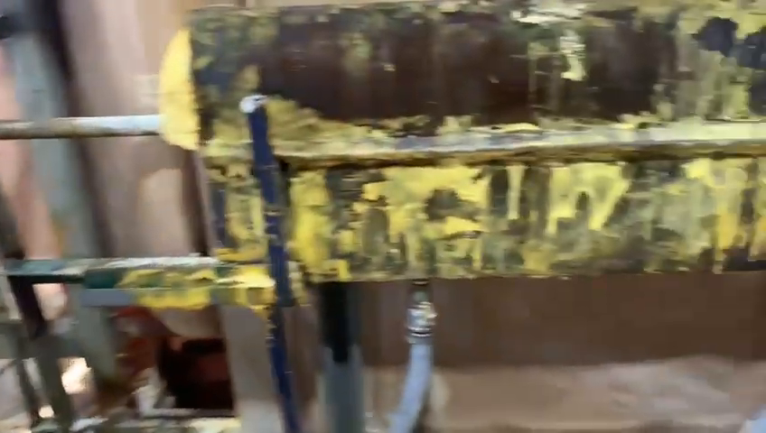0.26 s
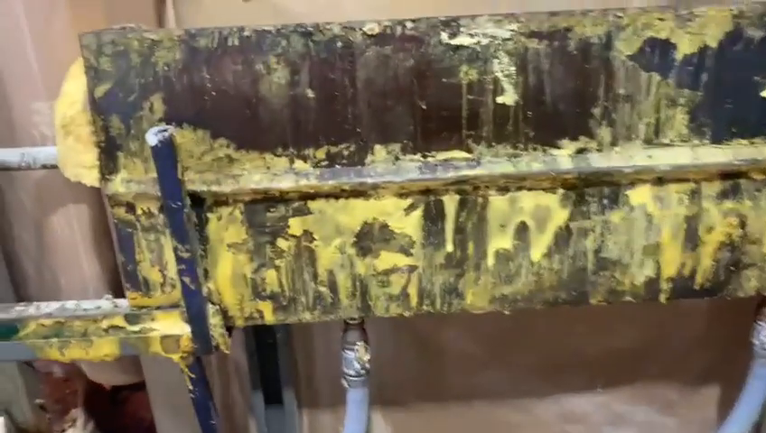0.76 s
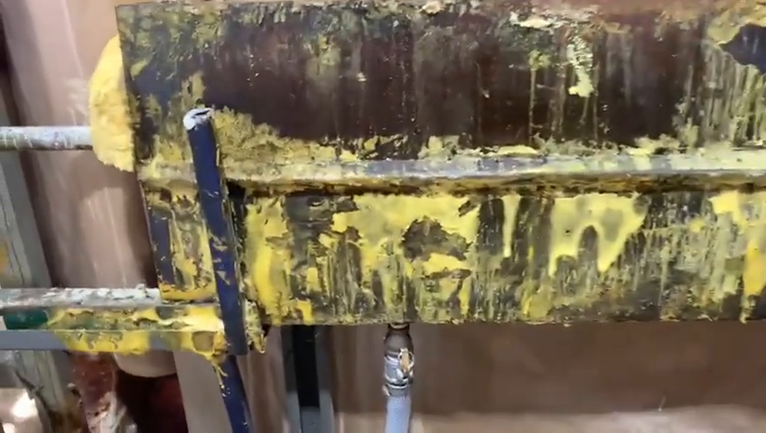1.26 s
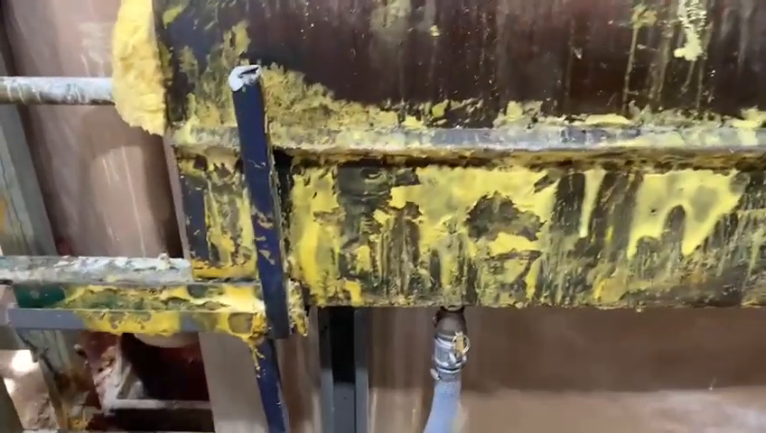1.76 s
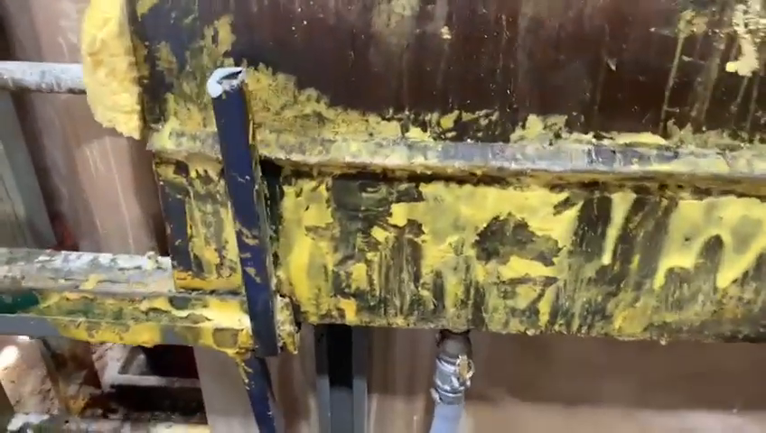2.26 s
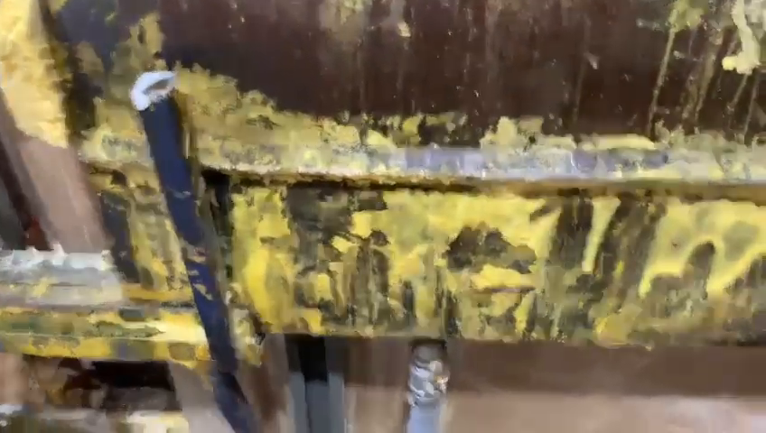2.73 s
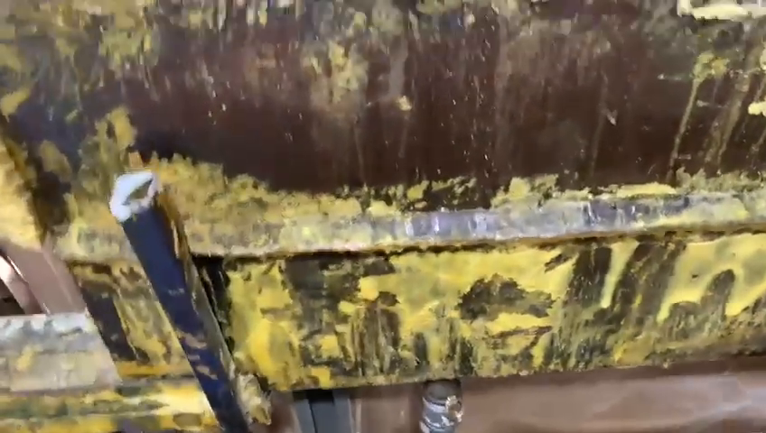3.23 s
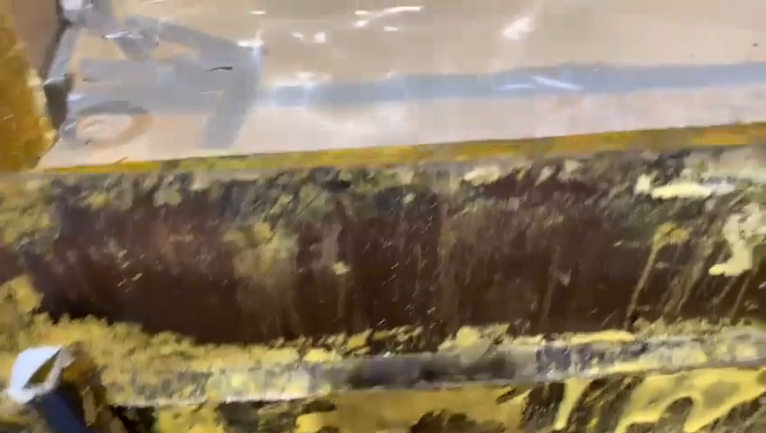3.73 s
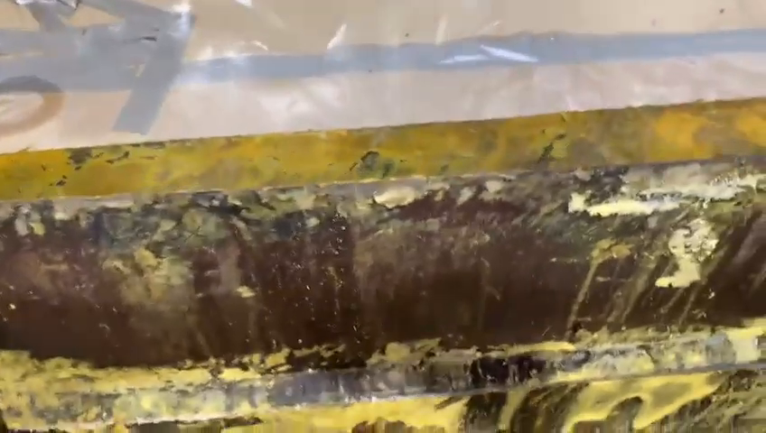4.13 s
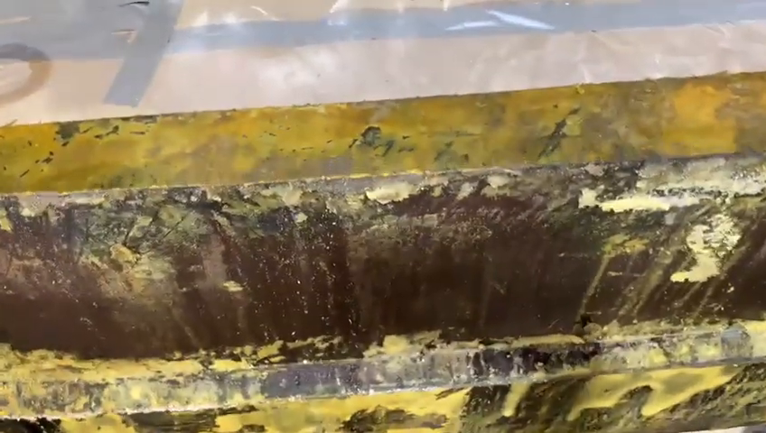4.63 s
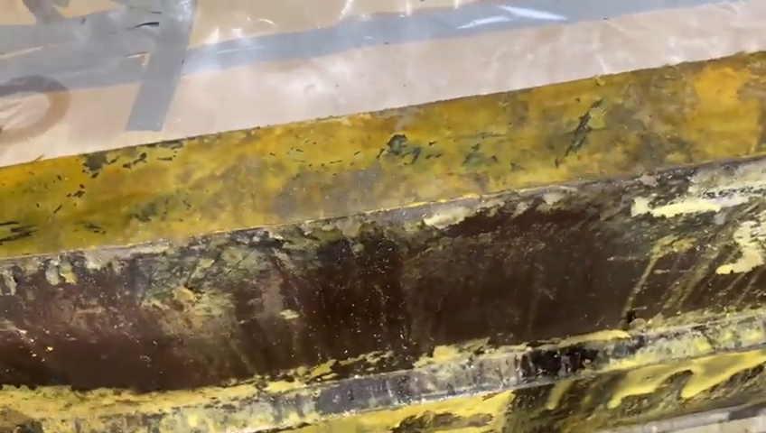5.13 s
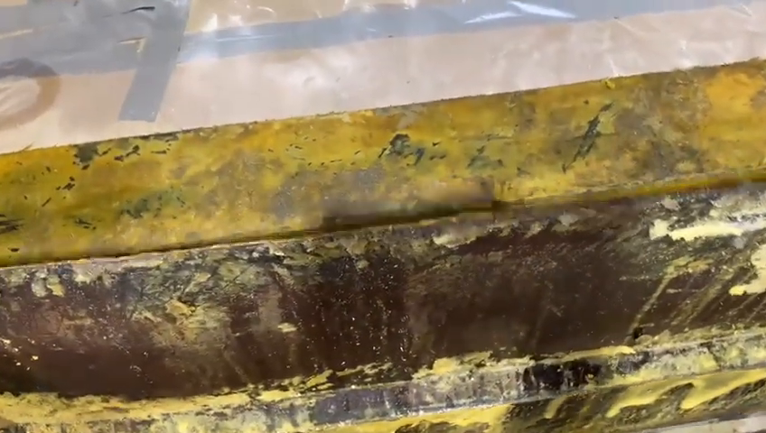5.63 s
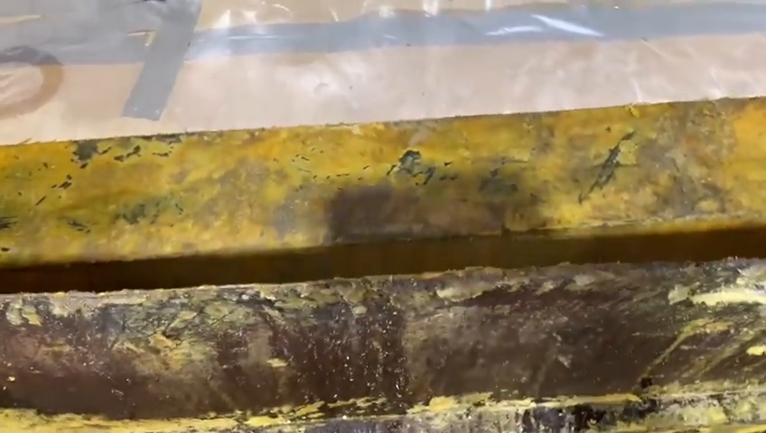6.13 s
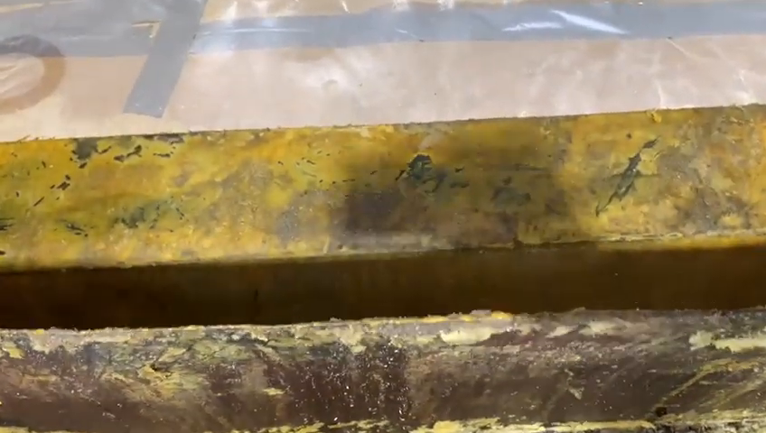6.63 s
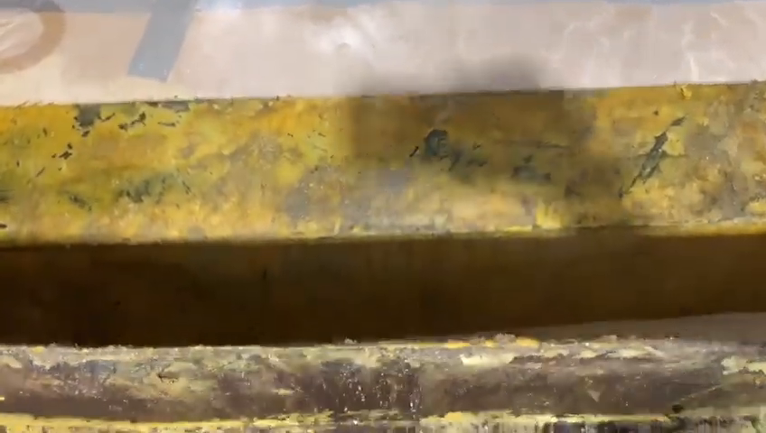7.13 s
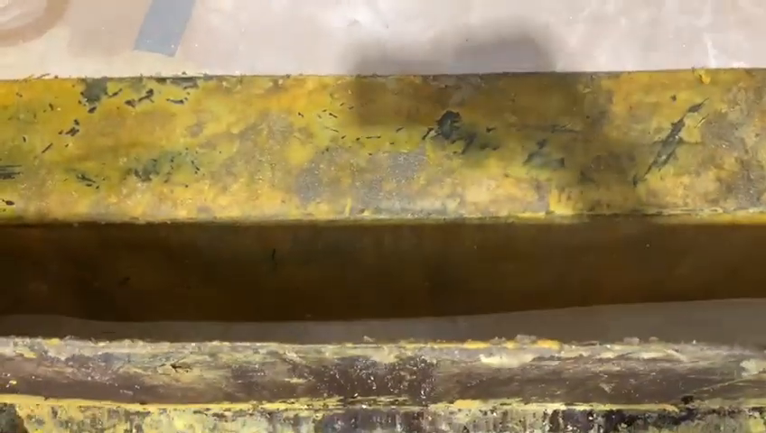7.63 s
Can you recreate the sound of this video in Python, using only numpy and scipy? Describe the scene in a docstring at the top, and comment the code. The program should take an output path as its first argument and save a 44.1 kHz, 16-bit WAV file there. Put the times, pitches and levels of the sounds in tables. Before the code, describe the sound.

A continuous hum of machines and fans fills a large hall, with thin, fluttering whines shifting above it.

```python
"""A factory hall, heard by a hand-held phone that drifts along a steel trough and tips into it.
A knocking machine and two fans hum in harmonic series; a variable-speed motor whines at its slot
harmonics and their sidebands. Under them lies the reverberant roar of the hall. Direct and reflected
waves interfere, so every tone swells and fades as the phone moves through the standing waves.
All sources sound from the start, each as a centre (sum) and a side (difference) signal."""
import sys
import numpy as np
from scipy import signal
from scipy.fft import irfft, next_fast_len
from scipy.io import wavfile
from scipy.ndimage import uniform_filter1d, map_coordinates

SR = 44100
rng = np.random.default_rng(int(sys.argv[2]) if len(sys.argv) > 2 else 0)


def materialize(psi):
    """Save the field psi as 16-bit PCM at rate SR to the path in sys.argv[1].

    A 1-D psi becomes a single channel; in a 2-D psi each row is a channel.
    """
    bounded = np.clip(np.atleast_2d(psi).T, -1, 1)
    quanta = np.round(bounded * 32767).astype(np.int16)
    wavfile.write(sys.argv[1], SR, quanta)


N = 347419
FFT_SIZE, TIME = next_fast_len(N), np.arange(N) / SR
STROKE_HZ, FAN_HZ, BLOWER_HZ = 40.37, 28.8, 26.56  # stroke rate and the two shaft rates
SUPPLY_SHARE = .1387  # supply frequency over slot frequency


def undb(db):
    """Amplitude ratio of a level."""
    return 10 ** (np.asarray(db, float) / 20)


def at_frequency(table, hz):
    """Columns interpolated on a logarithmic frequency axis."""
    first, *rest = np.transpose(table)
    return [np.interp(np.log(np.maximum(hz, 1)), np.log(first), c) for c in rest]


def in_time(table):
    """Columns interpolated at every sample."""
    first, *rest = np.transpose(table)
    return [np.interp(TIME, first, c) for c in rest]


def complex_noise(*shape):
    """Gaussian amplitudes of unit power and random phase."""
    return (rng.standard_normal(shape) + 1j * rng.standard_normal(shape)) / np.sqrt(2)


def walk(rate, step=32):
    """Low-pass noise: random values held 1 / rate s and smoothed twice."""
    hold = int(SR / rate / step)
    coarse = np.repeat(rng.standard_normal(N // step // hold + 2), hold)
    return np.repeat(uniform_filter1d(uniform_filter1d(coarse, hold), hold), step)[:N]


# Coherence of side with centre: f/Hz, in-phase part, quadrature part
COHERENCE = [(50, -.2, .2), (125, -0.66, .22), (250, -0.29, .2), (600, 0.18, .4), (1100, 0.23, .4),
             (1600, -0.26, -.2), (2400, 0.095, .12), (4800, -0.095, -.05), (7000, -0.19, .1)]

def coherent_side(centre, independent, hz):
    """Partial coherence: the side is a phase-shifted share of the centre plus an independent part."""
    in_phase, quadrature = at_frequency(COHERENCE, hz)
    share = in_phase + 1j * quadrature
    return share * centre + np.sqrt(np.clip(1 - abs(share) ** 2, 0, 1)) * independent


def multipath(hz, centre_db, side_db, phone_m_per_s=.25):
    """Multipath fading: each direct ray beats with reflections Doppler-shifted by the phone's motion."""
    spectrum = np.zeros((2, FFT_SIZE // 2 + 1), complex)
    offset = np.arange(-80, 81)
    for f, db in zip(hz, np.transpose([centre_db, side_db])):
        spread = np.exp(-abs(offset) * SR / FFT_SIZE / (.06 + .6 * f * phone_m_per_s / 343))
        direct = np.clip(400 / f, .4, 3)  # long waves keep their direct ray
        rays = complex_noise(2, len(offset)) * spread / np.sqrt(np.sum(spread ** 2))
        rays[:, offset == 0] += direct * np.exp(2j * np.pi * rng.random((2, 1)))
        rays[1] = coherent_side(rays[0], rays[1], f)
        bins = int(round(f * FFT_SIZE / SR)) + offset
        spectrum[:, bins] += undb(db)[:, None] * rays / np.sqrt(1 + direct ** 2)
    return irfft(spectrum, FFT_SIZE) * FFT_SIZE / np.sqrt(2)


def fluttering_tone(cycles, centre_db, side_db, lean=0.):
    """Interference: reflections make a tone flutter, more at high pitch; lean draws it to the right."""
    mean_hz = cycles[-1] * SR / N
    phase = 2 * np.pi * (cycles + rng.random())
    side_phase = np.pi + (1 - lean) * (2 * np.pi * (rng.random() - .5) + 2.87 * walk(1.53))
    faintness = np.clip(undb(-36 - centre_db), .3, 1)  # loud peaks are steadier
    depth = .55 * min((mean_hz / 3000) ** .44, 1.3) * faintness
    shimmer = .9 * (walk(55) + 1j * walk(55))
    flutter = (1 + depth * (walk(9) + 1j * walk(20) + shimmer)) / np.sqrt(1 + depth ** 2)
    centre = flutter * np.exp(1j * phase)
    side = centre * np.exp(1j * side_phase)
    return np.sqrt(2) * np.array([undb(centre_db) * centre.imag, undb(side_db) * side.imag])


# Standing-wave maxima: peak t/s, f/Hz, width at half amplitude/s, centre level/dB, side level/dB
SWELLS = [(0.1, 3362, 0.25, -44, -47), (0.015, 2394, 0.08, -39, -47), (0.102, 5770, 0.32, -46, -53),
          (0.1, 5319, 0.35, -48, -60), (0.1, 345.6, 0.4, -43, -54), (0.62, 2987, 0.62, -41, -52),
          (0.22, 2953, 0.3, -39, -50), (2.1, 2953, 0.54, -42, -51), (3.0, 2953, 0.2, -38, -50),
          (1.75, 3372, 0.2, -46, -52), (1.75, 3859, 0.22, -44, -55), (2.6, 3859, 0.44, -48, -55),
          (5.0, 3859, 0.23, -49, -55), (4.5, 3926, 0.16, -51, -55), (6.0, 1108, 0.39, -45, -54),
          (7.5, 1108, 0.31, -49, -50), (1.75, 939, 0.27, -44, -52), (7.3, 2642, 0.9, -47, -56),
          (3.753, 2987, 0.25, -45, -52), (0.75, 163, 0.3, -48, -49), (1.1, 1100, 0.5, -44.5, -50),
          (1.45, 2630, 0.15, -42, -58), (0.196, 2896, 0.1, -29.5, -56), (0.25, 1476, 0.41, -52, -49),
          (0.3, 2394, 0.35, -40, -50), (0.3, 5386, 0.15, -50.5, -58), (0.301, 3860, 0.15, -47, -53),
          (0.3, 4440, 0.27, -46, -55), (0.35, 1529, 0.73, -43, -46), (0.5, 4860, 0.25, -51, -44),
          (0.65, 3860, 0.15, -47, -52), (0.85, 943, 0.24, -48, -48), (0.18, 3927, 0.13, -48, -40),
          (0.25, 4370, 0.23, -44, -43), (0.3, 481, 1.0, -67, -46), (0.336, 2877, 0.23, -26.5, -36),
          (0.37, 162.2, 0.18, -32, -39), (0.41, 4320, 0.1, -48, -40), (0.442, 2890, 0.072, -33, -42),
          (0.48, 2465, 0.25, -36.5, -66), (0.5, 173, 2.5, -35, -50), (0.582, 3361, 0.2, -28.5, -56),
          (0.57, 4370, 0.1, -41, -59), (0.6, 411.7, 1.24, -42, -50), (0.61, 3440, 0.25, -62, -38),
          (0.68, 4420, 0.23, -44, -53), (0.69, 421, 0.87, -42.5, -47), (0.686, 3380, 0.092, -45, -44),
          (0.84, 3890, 0.086, -43, -37), (0.867, 161, 0.19, -33.5, -47), (0.915, 2460, 0.16, -38, -66),
          (0.92, 3927, 0.13, -47, -40), (1.0, 1522, 0.52, -38, -43), (1.048, 2404, 0.36, -44, -44),
          (1.05, 1220, 0.44, -40.5, -39), (1.35, 2460, 0.15, -49, -60), (1.55, 3420, 0.16, -43, -48),
          (1.38, 161.7, 0.16, -37, -48), (1.472, 2870, 0.15, -37, -47), (1.54, 345.7, 0.68, -36.5, -70),
          (1.647, 2461, 0.1, -32.5, -66), (1.75, 1222, 0.32, -44, -46), (1.85, 412, 0.59, -41, -50),
          (1.848, 1470, 0.23, -50, -46), (1.897, 162, 0.7, -44, -54), (1.901, 3010, 0.42, -51, -52),
          (2.2, 2645, 0.12, -45.5, -58), (2.4, 345.6, 1.1, -44, -54), (2.692, 1525, 0.29, -48.5, -45),
          (3.0, 172.4, 0.9, -40, -56), (1.923, 2900, 0.097, -39, -35), (2.3, 1212, 0.91, -47, -53),
          (1.96, 3353, 0.072, -34, -54), (2.102, 2392, 0.4, -34, -66), (1.95, 174.4, 1.3, -41, -56),
          (2.294, 1523, 0.3, -34.5, -49), (2.34, 1490, 0.21, -51, -37), (2.4, 935, 0.53, -47, -46),
          (2.37, 161, 0.16, -35.5, -56), (2.5, 426.5, 0.98, -42.5, -52), (2.6, 2395, 0.15, -51, -29),
          (2.66, 1533, 0.36, -54, -34), (3.1, 3372, 0.34, -47, -52), (2.8, 3410, 0.43, -40, -51),
          (3.0, 939, 0.43, -52, -50), (3.05, 4960, 0.22, -48, -52), (2.83, 3850, 0.1, -39, -45),
          (2.9, 2390, 0.27, -43, -66), (2.98, 4350, 0.39, -46, -66), (3.0, 480, 0.8, -58, -66),
          (3.18, 345.4, 0.81, -40, -48), (3.21, 3840, 0.25, -48, -65), (3.277, 151, 0.19, -35.5, -53),
          (3.348, 1530, 0.27, -38, -44), (3.3, 1214, 0.26, -42, -50), (3.7, 1493, 0.5, -41.5, -39),
          (4.0, 2399, 0.22, -45.5, -60), (3.55, 160.7, 0.25, -40, -51), (3.596, 2940, 0.4, -61, -56),
          (4.1, 172.4, 0.69, -42.5, -50), (4.1, 348, 0.64, -50, -51), (4.75, 172.8, 0.3, -39, -51),
          (4.853, 2670, 0.24, -40, -55), (5.15, 1528, 0.85, -45.5, -39), (6.103, 171.2, 0.3, -43, -54),
          (6.452, 1133, 0.53, -44, -47), (6.7, 2980, 0.52, -43.5, -58), (6.998, 162.5, 0.25, -38, -52),
          (7.15, 1104, 0.22, -48, -50), (7.15, 2985, 0.12, -38, -52), (7.15, 2670, 0.2, -48, -57),
          (7.25, 174, 0.25, -43, -54), (4.097, 4413, 0.24, -48, -57.5), (4.251, 1200, 0.12, -43, -46),
          (4.256, 2870, 0.57, -47, -48), (4.546, 5420, 0.37, -47.5, -54), (4.545, 4310, 0.23, -47, -55),
          (4.65, 2440, 0.24, -46, -53), (4.75, 1176, 0.39, -45, -47), (4.75, 3410, 0.71, -46, -48),
          (5.0, 4832, 0.24, -44.5, -55), (5.199, 5310, 0.4, -51, -60), (5.201, 4940, 0.4, -59, -47),
          (5.3, 3376, 0.21, -45, -50), (5.45, 4840, 0.25, -52, -58), (5.55, 2510, 0.22, -53, -55),
          (5.6, 4460, 0.14, -49, -55), (4.5, 1535, 0.79, -36.5, -37), (4.513, 3396, 0.14, -34.5, -42),
          (4.69, 4410, 0.24, -45, -48), (4.8, 161, 0.35, -44, -59), (4.92, 2886, 0.092, -45, -37),
          (5.0, 485, 5.3, -44, -50), (5.01, 3372, 0.1, -56, -35), (5.017, 2405, 0.29, -38, -44),
          (5.052, 1013, 0.56, -44, -43), (5.13, 2450, 0.1, -42, -51), (5.2, 1213, 0.34, -44, -38),
          (5.58, 3460, 0.63, -53, -41), (5.605, 151.5, 0.16, -38, -58), (5.893, 943, 0.64, -45, -46),
          (5.75, 1182, 0.57, -38.5, -40), (5.85, 1218, 0.25, -45, -50), (6.35, 1183, 0.68, -43, -46),
          (6.6, 4444, 0.71, -45.5, -55), (6.65, 4900, 0.2, -51, -60), (6.903, 3470, 0.27, -42, -54),
          (6.9, 4900, 0.7, -52, -56), (6.947, 3950, 0.25, -47, -50), (7.053, 2400, 0.25, -42, -55),
          (7.103, 3420, 0.16, -39, -47), (7.2, 950, 0.45, -52, -55), (7.25, 4460, 0.4, -52, -55),
          (7.4, 4840, 0.4, -51, -49), (7.45, 3460, 0.21, -51, -48), (7.555, 3439, 0.22, -39, -50),
          (6.04, 2466, 0.25, -35.5, -51), (6.1, 2890, 0.3, -32, -43), (6.36, 2890, 0.25, -36, -43),
          (6.2, 3380, 0.22, -35, -36), (6.4, 2390, 0.4, -53, -34), (6.37, 3853, 0.31, -45.5, -53),
          (6.5, 1009, 0.25, -46, -47), (6.6, 1524, 1.24, -40.5, -67), (6.63, 2884, 0.38, -36, -35),
          (6.7, 2480, 0.7, -43, -43), (6.94, 4350, 0.18, -50, -42), (7.08, 3950, 0.55, -60, -46),
          (7.167, 2870, 0.11, -47, -41), (7.35, 3365, 0.21, -36.5, -50), (7.43, 2404, 0.14, -36.5, -66),
          (7.3, 1216, 0.59, -48.5, -40), (7.57, 2474, 0.18, -37, -66), (7.67, 940, 0.26, -39, -45)]

def standing_wave(cycles, hz, rest_db, lean=0., wander_db=5, step=32):
    """Addition of powers: a strong tone's wandering level plus the swells nearest to it in pitch."""
    slot_hz = in_time(SLOT_RATE)[0].mean()
    whine_hz = [slot_hz * (k + band * SUPPLY_SHARE) for k, band, *_ in STRONG_WHINES]
    strong_hz = np.array([row[0] for row in STRONG_HUMS] + whine_hz)
    wander_rate = 1.485 + 1.5 * hz / 1000
    wander = wander_db * np.array([walk(wander_rate), walk(wander_rate)])[:, ::step]
    power = undb(np.reshape(rest_db, (2, 1)) + wander) ** 2
    for peak, swell_hz, width, *db in SWELLS:
        if abs(swell_hz - hz) <= np.min(abs(swell_hz - strong_hz)) + 1e-6:
            bell = .5 ** (abs(2 * (TIME[::step] - peak) / width) ** 2.8)  # flattened top
            power = power + (undb(db)[:, None] * bell) ** 2
    levels_db = np.repeat(10 * np.log10(power), step, axis=1)[:, :N]
    return fluttering_tone(cycles, *levels_db, lean=lean)


# Line spectrum of the strokes: harmonic number, centre level/dB, side level/dB
STROKE_LINES = [(1, -52, -76), (3, -51, -61), (5, -43, -49), (6, -53, -54), (7, -52, -59), (8, -50, -60),
                (9, -50, -52), (10, -53, -54), (11, -55, -57), (14, -50, -55), (15, -55, -62),
                (16, -56, -58), (18, -55, -57), (20, -55, -54), (24, -56, -54), (32, -56, -50),
                (35, -60, -53), (36, -57, -48), (37, -53, -49), (40, -63, -48), (41, -60, -53),
                (42, -61, -55), (44, -58, -53), (46, -61, -54), (66, -55, -62), (70, -52, -57),
                (71, -57, -56), (72, -55, -54), (73, -57, -56), (74, -58, -56), (75, -56, -54),
                (76, -54, -53), (78, -55, -55), (80, -63, -54)]

def knocking_machine():
    """Fourier series: periodic strokes radiate at whole multiples of their rate."""
    harmonic, *levels_db = np.transpose(STROKE_LINES)
    return multipath(harmonic * STROKE_HZ, *levels_db)


# Line spectra of the two fans: harmonic number, centre level/dB, side level/dB
FAN_LINES = [(1, -61, -89), (2, -46, -74), (3, -53, -71), (18, -53, -52), (20, -60, -56)]
BLOWER_LINES = [(2, -56, -87), (4, -51, -66), (8, -54, -65), (11, -54, -64), (15, -48, -54), (17, -54, -61),
                (18, -50, -53), (19, -53, -55), (20, -62, -56), (36, -61, -59)]

def fans():
    """Rotational noise: each fan radiates harmonics of its constant shaft rate."""
    out = 0
    for shaft_hz, lines in ((FAN_HZ, FAN_LINES), (BLOWER_HZ, BLOWER_LINES)):
        harmonic, *levels_db = np.transpose(lines)
        out = out + multipath(harmonic * shaft_hz, *levels_db)
    return out


# Single tones: f/Hz, centre level/dB, side level/dB
LONE_TONES = [(91.3, -48, -74), (99, -46, -73), (640.5, -57, -58), (1039, -58, -56)]

def other_machines():
    """Steady vibration: other machines each radiate a tone that fades by interference."""
    return multipath(*np.transpose(LONE_TONES))


# Spectral envelope of the remaining stroke harmonics: f/Hz, level/dB
STROKE_ENVELOPE = [(40, -75), (300, -73), (1500, -71.5), (3000, -51.5), (4500, -113), (7000, -63.5)]

def stroke_overtones():
    """Harmonic series: the remaining lines scatter about an envelope, as wide in stereo as the roar."""
    taken = [2, 4, 12, 25, 38] + [row[0] for row in STROKE_LINES]
    hz = STROKE_HZ * np.setdiff1d(np.arange(1, 170), taken)
    centre_db = at_frequency(STROKE_ENVELOPE, hz)[0] + 7.4 * rng.standard_normal(len(hz))
    width_db = at_frequency(ROAR_SIDE, hz)[0] - at_frequency(ROAR_CENTRE, hz)[0]
    return multipath(hz, centre_db, centre_db + width_db)


# Shielding as the phone tips into the trough: t/s, bass gain/dB, treble gain/dB
SHIELDING = [(0, -0.5, -5), (1, -1, -5), (2, -1, -6), (3, -1.5, -4.5), (4, -2, -4.5), (5, -0.5, -4),
             (6, -2, -3.5), (7, -1.5, -3), (7.9, -2.5, -3.5)]

def trough_shadow(tones):
    """Acoustic shadow: the trough weakens the lower harmonics."""
    bass = signal.sosfilt(signal.butter(2, 450, fs=SR, output="sos"), tones)
    return tones + bass * (undb(in_time(SHIELDING)[0]) - 1)


# Strength of the deep hum: t/s, centre level/dB
DEEP_HUM_LEVEL = [(0.0, -32), (0.02, -33), (2.54, -32), (3.24, -36.5), (3.29, -32), (3.9, -37),
                  (4.73, -33.5), (4.8, -46), (4.89, -36), (5.0, -42), (5.08, -34), (5.54, -34.5),
                  (5.61, -45), (6.07, -33), (6.58, -37), (6.62, -44.5), (7.21, -34), (7.87, -40)]

def deep_hum():
    """Second harmonic of the strokes: a strong hum whose level dips briefly."""
    level_db, = in_time(DEEP_HUM_LEVEL)
    return fluttering_tone(2 * STROKE_HZ * TIME, level_db, level_db - 32, lean=.61)


# Strong hums between swells: f/Hz, centre level/dB, side level/dB
STRONG_HUMS = [(150.7, -50, -64), (4 * STROKE_HZ, -46, -52), (6 * FAN_HZ, -48, -54),
               (12 * FAN_HZ, -52, -54), (414.4, -55, -54), (16 * BLOWER_HZ, -52, -58),
               (12 * STROKE_HZ, -54, -49), (25 * STROKE_HZ, -60, -58), (38 * STROKE_HZ, -53, -41)]

def strong_hums():
    """Standing waves: machine tones of constant pitch swell; the low ones lie nearer the right port."""
    return sum(standing_wave(hz * TIME, hz, rest_db, lean=.52 * (hz < 450))
               for hz, *rest_db in STRONG_HUMS)


# Slot-passing frequency of the motor: t/s, f/Hz
SLOT_RATE = [(0, 242.64), (.55, 242.68), (1.25, 243.53), (1.5, 243.51), (1.85, 243.02), (2.5, 242.9),
             (3, 242.92), (3.9, 243.35), (4.25, 243.42), (4.8, 243.76), (7.9, 243.8)]
# Motor lines, the strong ones between swells: slot harmonic, sideband, centre level/dB, side level/dB
WHINES = [(2, -1, -54, -59), (2, 1, -52, -54), (3, 0, -53, -54), (4, 0, -55, -53), (4, 1, -51, -50),
          (5, 1, -58, -56), (6, -1, -52, -47), (7, 0, -66, -57), (8, -1, -53, -54), (8, 1, -52, -47),
          (11, -2, -56, -60), (14, 2, -61, -57), (18, 2, -58, -60), (20, -2, -58, -60), (19, -3, -58, -60),
          (19, -2, -59, -60), (19, -1, -60, -60), (20, 2, -62, -60), (22, -2, -63, -62), (25, -1, -63, -63),
          (25, 0, -63, -63), (25, 1, -63, -63), (22, 2, -61, -62), (24, -1, -61, -60), (24, 1, -62, -63),
          (26, -2, -66, -64), (26, -1, -67, -63)]
STRONG_WHINES = [(4, -1, -54, -53), (4, 4, -57, -51), (5, -1, -61, -57), (5, 0, -55, -52), (6, 1, -58, -48),
                 (10, -1, -50, -52), (10, 1, -50, -58), (11, -1, -54, -63), (12, -1, -48, -52),
                 (12, 1, -54, -52), (12, 2, -54, -54), (14, -1, -50, -52), (14, 1, -56, -50),
                 (16, -1, -58, -57), (16, 1, -58, -55), (18, -1, -57, -57), (18, 1, -57, -56),
                 (20, -1, -58, -59), (20, 1, -61, -57), (22, -1, -65, -63), (22, 1, -63, -63),
                 (24, -2, -65, -61)]
# Spectral envelope of the faint sidebands: f/Hz, level/dB
SIDEBAND_ENVELOPE = [(500, -71), (2500, -70.5), (4500, -68.5), (7000, -96)]

def motor():
    """Modulation: the supply splits the slot harmonics into sidebands; all glide with the speed."""
    slot_hz, = in_time(SLOT_RATE)
    mean_hz, cycles = slot_hz.mean(), np.cumsum(slot_hz) / SR
    harmonic, band, *levels_db = np.transpose(WHINES)
    steady = multipath(mean_hz * (harmonic + band * SUPPLY_SHARE), *levels_db)
    faint_hz = mean_hz * (np.arange(3, 28)[:, None] + np.arange(-3, 4) * SUPPLY_SHARE).ravel()
    faint_db = at_frequency(SIDEBAND_ENVELOPE, faint_hz)[0] + 3.8 * rng.standard_normal(len(faint_hz))
    steady += multipath(faint_hz, faint_db, faint_db)
    warped_time = cycles * SR / mean_hz  # bends every line together
    out = np.array([map_coordinates(x, [warped_time], order=3, mode="grid-wrap") for x in steady])
    for harmonic, band, *rest_db in STRONG_WHINES:
        multiple = harmonic + band * SUPPLY_SHARE
        out += standing_wave(cycles * multiple, mean_hz * multiple, rest_db)
    return out


# Noise spectra of the hall; the ports oppose near 7 kHz, agree near 9 kHz: f/Hz, spectrum level/dB
ROAR_CENTRE = [(25, -74), (50, -64), (68, -61), (95, -55), (135, -61.5), (160, -56.5), (230, -60.5),
               (350, -59), (800, -67), (1100, -67.5), (1700, -68), (2300, -64), (3400, -66.5), (3650, -74),
               (4600, -70), (6800, -78), (6910, -80), (6990, -108), (7060, -99.5), (7500, -101),
               (7700, -79.5), (8200, -74), (9000, -72), (10200, -78.5), (10900, -103)]
ROAR_SIDE = [(25, -91), (110, -68.5), (350, -63), (800, -67), (1700, -63.5), (2200, -67), (3400, -67),
             (3650, -68.5), (5500, -73), (8200, -72.5), (8500, -99), (8900, -135), (9600, -135),
             (9800, -100), (10400, -100), (10900, -72.5)]

def hall_roar():
    """Reverberant field: noise in bands that flicker independently, humped at even slot harmonics."""
    hz = np.arange(FFT_SIZE // 2 + 1) * SR / FFT_SIZE
    hump_db = np.interp(hz, [500, 2500, 4700, 5300, 7500], [0, 2, 2, 3.6, 0])
    ripple_db = hump_db * np.cos(np.pi * hz / np.array(SLOT_RATE)[:, 1].mean())
    density_db = np.array([at_frequency(table, hz)[0] for table in (ROAR_CENTRE, ROAR_SIDE)])
    gain = undb(density_db + ripple_db) * np.sqrt(FFT_SIZE * SR / 2)
    centre, independent = complex_noise(2, len(hz))
    spectrum = gain * np.array([centre, coherent_side(centre, independent, hz)])
    bass_db, treble_db = in_time(SHIELDING)
    band_number = 46 * np.log2(1 + hz / 12000) + 1.6 * np.log2(1 + hz / 60)
    out = 0
    for k in range(57):
        band = irfft(spectrum * np.clip(1 - abs(band_number - k), 0, 1), FFT_SIZE)[:, :N]
        band_hz = hz[np.searchsorted(band_number, k)]
        bass, treble = np.interp(band_hz, [250, 700], [1, 0]), np.interp(band_hz, [3500, 8000], [0, 1])
        depth_db = np.interp(band_hz, [300, 1500, 4000, 9000], [1.6, 10.3, 13, 16])
        dips_db = depth_db * np.maximum([walk(9), walk(9)], 0) ** 2
        out = out + band * undb(bass * bass_db + treble * treble_db - dips_db)
    return out


def scene():
    """Superposition: the sources add; centre plus and minus side give the left and right ports."""
    tones = knocking_machine() + fans() + other_machines() + stroke_overtones()
    centre, side = trough_shadow(tones[:, :N]) + deep_hum() + strong_hums() + motor() + hall_roar()
    return np.array([centre + side, centre - side])


def record(dry, cutoff_hz=10900):
    """Band limiting: the phone cuts the top of the spectrum."""
    return signal.sosfilt(signal.ellip(10, .2, 80, cutoff_hz, fs=SR, output="sos"), dry)


dry = scene()
out = record(dry)
materialize(out)
```